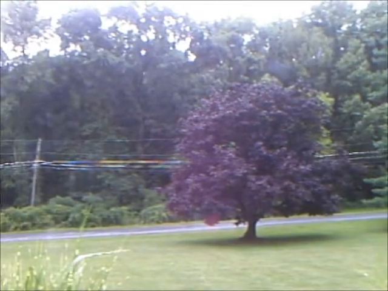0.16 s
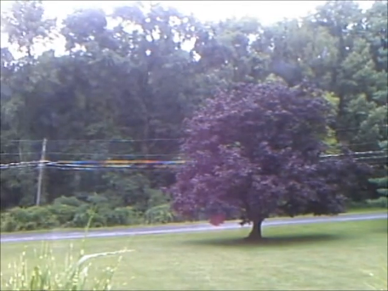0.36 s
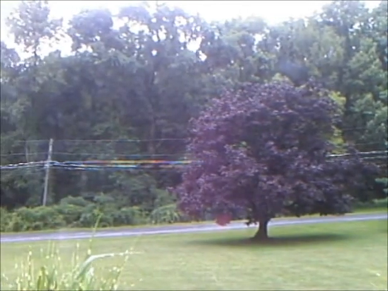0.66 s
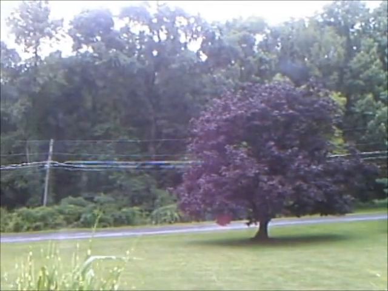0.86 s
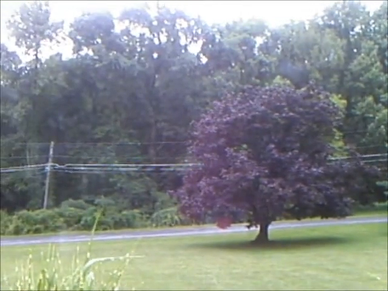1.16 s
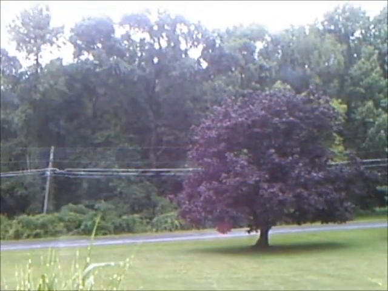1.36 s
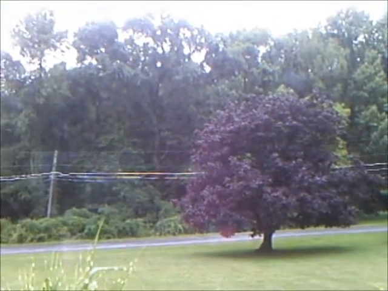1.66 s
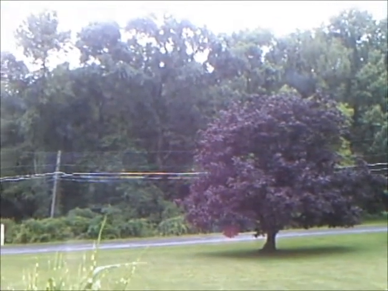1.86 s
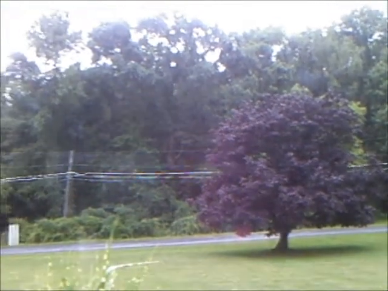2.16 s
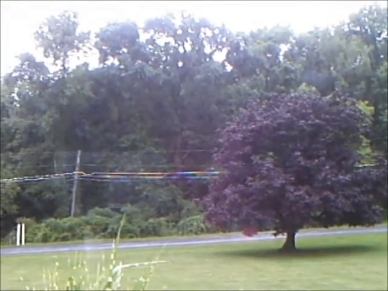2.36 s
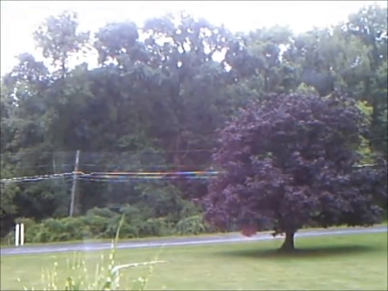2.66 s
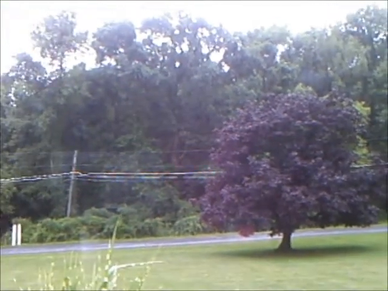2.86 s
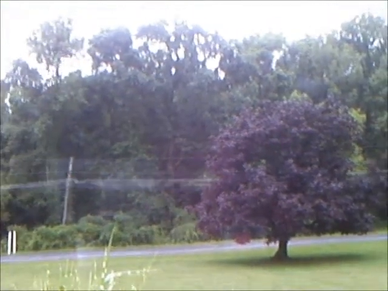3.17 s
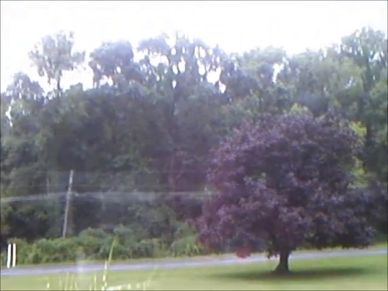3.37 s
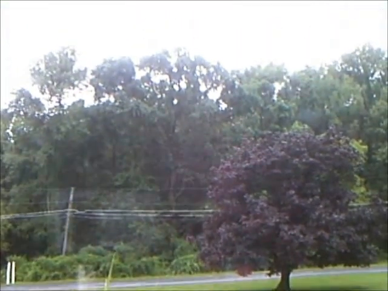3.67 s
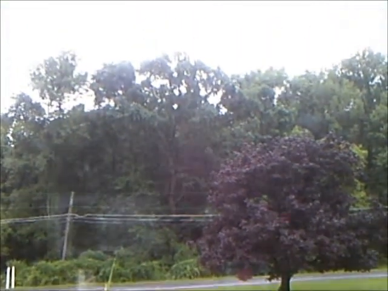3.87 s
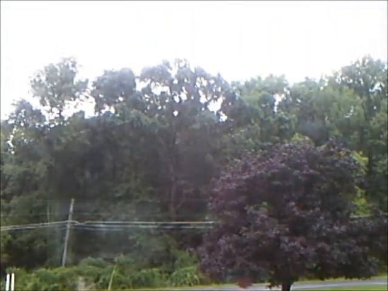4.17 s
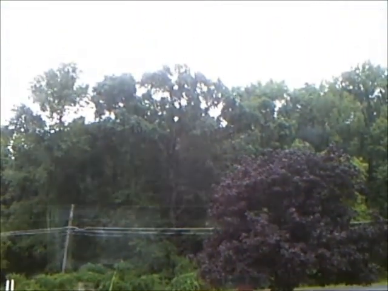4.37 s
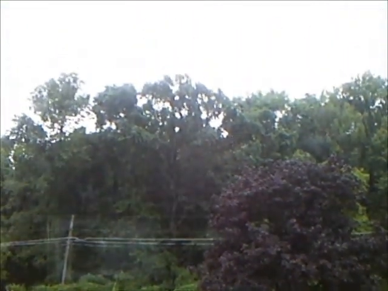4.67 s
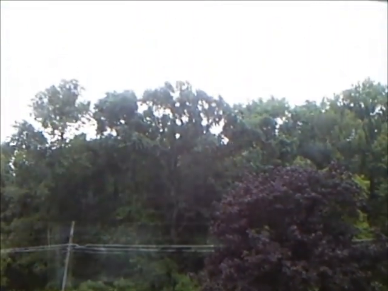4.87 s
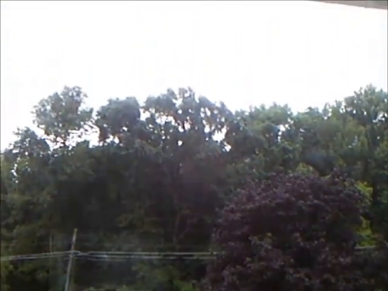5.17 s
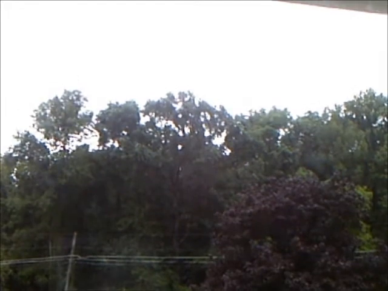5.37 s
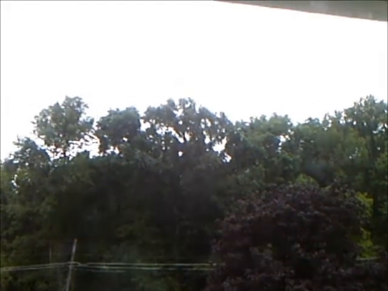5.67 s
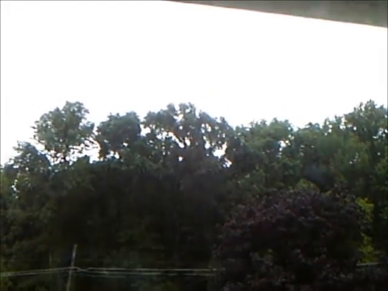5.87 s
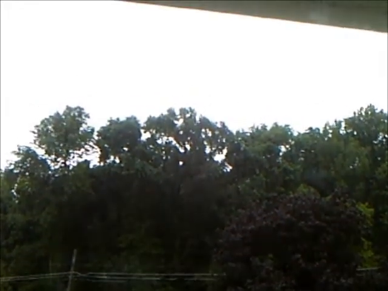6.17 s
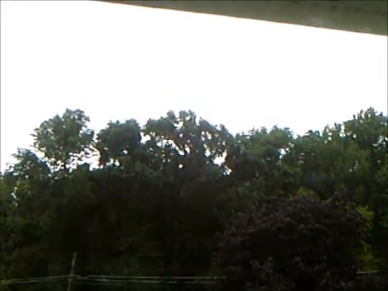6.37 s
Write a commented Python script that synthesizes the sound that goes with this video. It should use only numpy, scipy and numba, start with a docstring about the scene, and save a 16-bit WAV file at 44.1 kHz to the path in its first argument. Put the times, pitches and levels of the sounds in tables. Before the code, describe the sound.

Storm wind roars through tall trees, strongest at first, easing to a lull then gusting again, over deep rumble, low hum and hiss.

```python
"""Tall trees roar in a storm wind, heard from a sheltered porch that shades their tone.
Gusts sweep the crowns as gliding bands of noise; near leaves rustle as a spray of tiny touches.
Air buffets the porch as deep lumpy noise over a steady far rumble.
Faint insects chirp, lisp and pulse as narrow noise; a motor hums in three harmonics,
mains spikes make a thin buzz, and coloured noise hisses throughout."""
import sys
import numpy as np
from scipy import signal
from scipy.fft import rfft, irfft
from scipy.io import wavfile
from numba import njit

SR = 44100
rng = np.random.default_rng(int(sys.argv[2]) if len(sys.argv) > 2 else 0)


def wav_record(signal):
    """Record a signal, one row per channel, as 16-bit PCM in the file named by sys.argv[1]."""
    frames = np.transpose(np.atleast_2d(signal))
    bounded = np.clip(frames, -1, 1)
    # unit amplitude maps onto the largest positive 16-bit level
    quanta = np.round(bounded * 32767).astype(np.int16)
    wavfile.write(sys.argv[1], SR, quanta)


N = 287091
TIME = np.arange(N) / SR
FREQS = np.fft.rfftfreq(N, 1 / SR)


def from_db(db):
    """Decibels to amplitude gain."""
    return 10 ** (np.asarray(db) / 20)


def rms_one(x):
    """Scale to unit power."""
    return x / np.sqrt(np.mean(x ** 2) + 1e-20)


def in_time(rows):
    """Interpolate each column of a time table to one value per sample."""
    times_s, *columns = np.transpose(rows)
    return [np.interp(TIME, times_s, column) for column in columns]


def coloured(x, spectrum):
    """Filter by a gain curve, interpolated in dB over log frequency."""
    hz, db = np.transpose(spectrum)
    gain_db = np.interp(np.log(FREQS + 1), np.log(hz), db)
    return irfft(rfft(x) * from_db(gain_db), N)


def noise(spectrum):
    """Coloured noise, rms 1."""
    return rms_one(coloured(rng.standard_normal(N), spectrum))


def drift(rate_hz):
    """Slow random curve, rms 1: two-pole filtered noise on a grid of 100 samples."""
    grid, settle = 100, 1000
    pole = np.exp(-2 * np.pi * rate_hz * grid / SR)
    draws = rng.standard_normal(N // grid + settle + 2)
    slow = signal.lfilter([1], [1, -2 * pole, pole * pole], draws)[settle:]
    return np.interp(np.arange(N) / grid, np.arange(len(slow)), rms_one(slow))


def swell(peak_s, db, rise_s, fall_s):
    """Gain with a Gaussian rise to a peak and a Gaussian fall."""
    age_s = TIME - peak_s
    side_s = np.where(age_s < 0, rise_s, fall_s)
    return from_db(db) * np.exp(-np.minimum((age_s / side_s) ** 2, 20))


def resonance(x, hz, width_hz):
    """Fixed two-pole resonance, about unit gain at its centre."""
    pole = np.exp(-np.pi * width_hz / SR)
    feed = np.array([1, 0, -1]) * (1 - pole * pole) / 2
    return signal.lfilter(feed, [1, -2 * pole * np.cos(2 * np.pi * hz / SR), pole * pole], x)


@njit
def gliding(x, hz, width_hz):
    """State-variable resonance with a moving centre, about unit gain there."""
    out, band, low = np.zeros(len(x)), 0., 0.
    for i in range(len(x)):
        step = 2 * np.sin(np.pi * hz[i] / SR)
        damping = width_hz / hz[i]
        low += step * band
        band += step * (x[i] - low - damping * band)
        out[i] = damping * band
    return out


def narrow_noise(hz, width_hz):
    """Noise passed twice through one resonance, rms 1."""
    once = resonance(rng.standard_normal(N), hz, width_hz)
    return rms_one(resonance(once, hz, width_hz))


# Roar spectrum before the split. Each row: frequency in Hz, relative density in dB.
WOODS_SPECTRUM = [(30, -28), (80, 2), (150, 1.5), (250, 2), (330, -4), (420, -11), (520, -10.5),
                  (700, -8.5), (900, -6.5), (1300, -12), (1580, -14.5), (1800, -18), (2550, -25),
                  (3100, -29), (9000, -76)]
# Wind strength, used relative to its mean. Each row: time in seconds, strength in dB.
WIND_STRENGTH = [(0.0, -34), (0.18, -36.5), (0.47, -39), (1.79, -41), (3.24, -46), (5.58, -48), (6.51, -43)]


def woods(low_db, high_db, roar_per_wind, bright_share, patchy_db):
    """Countless far branches blend to a smooth roar; its low and high parts sway separately."""
    wind_db, = in_time(WIND_STRENGTH)
    swing_db = roar_per_wind * (wind_db - wind_db.mean())
    bright_db = bright_share * (swing_db - np.median(swing_db))  # treble swells less
    lowpass = signal.butter(2, 600, fs=SR, output="sos")
    highpass = signal.butter(2, 600, "high", fs=SR, output="sos")
    low = signal.sosfilt(lowpass, noise(WOODS_SPECTRUM))
    high = signal.sosfilt(highpass, noise(WOODS_SPECTRUM))
    low_gain = from_db(low_db + swing_db + patchy_db * drift(2.1))
    high_gain = from_db(high_db + bright_db + patchy_db * drift(0.89))
    return low * low_gain + high * high_gain


# Gusts in the crowns; narrow ones whistle faintly. Each row: peak in seconds, level in dB, rise in seconds,
# fall in seconds, centre at the peak in Hz, glide in octaves per second, nominal width in Hz.
CROWN_GUSTS = [ (.05, -45, 0.35, 0.43, 344, -0.16, 170), (.05, -44, .3, .32, 707, 0.38, 346),
               (.58, -41.5, 0.52, 0.47, 877, 0.27, 340), (1.45, -56, 1.5, .2, 2043, 0.04, 151),
               (1.5, -49.5, .7, 1.6, 857, -0.27, 320), (1.58, -47.5, .4, 1.5, 2070, -0.39, 1180),
               (1.8, -52.5, 1.8, 1.6, 310, -0.0086, 153), (2.8, -48, 1.85, 1.25, 1216, -0.0045, 520),
               (3.699, -61, 1.3, 1.08, 2472, 0.038, 240), (4.8, -51.5, .42, 1.03, 1210, -0.0045, 570),
               (5.55, -64, .3, .3, 2520, 0.062, 200), (6.14, -44, 0.26, 0.52, 1200, -0.17, 500),
               (6.28, -45, 0.19, 0.38, 922, 0.017, 270), ]


def gust(row, flutter_db, churn_db, waver):
    """Twigs shed eddies at a pitch following air speed, so the rush glides as the gust passes."""
    peak_s, db, rise_s, fall_s, centre_hz, glide_oct_per_s, width_hz = row
    age_s = np.clip(TIME - peak_s, -2 * rise_s, 2 * fall_s)
    hz = centre_hz * 2 ** (glide_oct_per_s * age_s) * np.exp(waver * drift(4.9))
    rush = rng.standard_normal(N)
    for _ in range(4):  # steep flanks; each pass is wider than the nominal band
        rush = gliding(rush, hz, 1.32 * width_hz)
    unsteady = from_db(flutter_db * drift(10.0) + churn_db * drift(76))
    return rms_one(rush) * swell(peak_s, db, rise_s, fall_s) * unsteady


# Filter for the touches. Each row: frequency in Hz, relative gain in dB.
LEAF_SPECTRUM = [(400, -30), (1500, 5), (2000, 7.5), (3000, 3), (3700, 1.5), (4300, 4.5), (5200, 0),
                 (6300, 1.5), (7000, -8), (7700, -2.5), (9000, -13), (15000, -34)]
# Branches shaken harder. Each row: peak in seconds, rustle in dB, rise in seconds, fall in seconds.
LEAF_SHAKES = [(.15, -56, 0.89, 0.54), (1.23, -56, 0.39, 0.3), (6.0, -73, 0.44, .4)]


def leaves(rustle_db, touches_per_s, spread_db):
    """Near leaves brush in a dense spray of random touches, louder when their branches shake."""
    hits = rng.random(N) < touches_per_s / SR
    strength = rng.standard_normal(N) * from_db(spread_db * rng.standard_normal(N))
    rustle = rms_one(coloured(hits * strength, LEAF_SPECTRUM))
    shaking = from_db(rustle_db) + sum(swell(*shake) for shake in LEAF_SHAKES)
    return rustle * shaking * from_db(0.32 * drift(4.6))


# Porch reflections. Each row: centre in Hz, width in Hz, lift in dB (negative weakens).
PORCH_BANDS = [(878, 152, 4), (1222, 190, 4), (1574, 180, 3.5), (2660, 82, 0), (3550, 400, -0.5)]


def porch(x):
    """Reflections under the roof favour or weaken broad bands."""
    changes = [(from_db(lift_db) - 1) * resonance(x, hz, width_hz)
               for hz, width_hz, lift_db in PORCH_BANDS]
    return x + sum(changes)


# Buffeting spectrum. Each row: frequency in Hz, relative density in dB.
BUFFET_SPECTRUM = [(4, -19), (8, -3), (22, -4), (33, 0), (46, 5), (60, -7), (75, -8.5), (110, -35),
                   (180, -36), (400, -57), (2000, -100)]
# Puffs of air. Each row: peak in seconds, level in dB, rise in seconds, fall in seconds.
AIR_PUFFS = [(.15, -29.5, .16, 0.14), (.42, -27.5, 0.12, 0.16), (1.17, -37, 0.025, 0.036),
             (1.42, -34, 0.14, 0.15), (1.97, -42, .14, .24), (3.299, -36, 0.079, 0.091),
             (5.42, -37, .15, .07), (6.34, -37, .05, 0.066)]


def buffeting(base_db, lumpy_db, lumps_hz):
    """Air pushes on the porch in deep random lumps, now and then in a stronger puff."""
    push = from_db(base_db) + sum(swell(*puff) for puff in AIR_PUFFS)
    return noise(BUFFET_SPECTRUM) * push * from_db(lumpy_db * drift(lumps_hz))


# Far storm spectrum. Each row: frequency in Hz, relative density in dB.
RUMBLE_SPECTRUM = [(15, -6), (45, -11.5), (62, 2.5), (78, -1), (95, 0.5), (120, 0.5), (150, -0.5),
                   (240, -6.5), (330, -17.5), (500, -16.5), (2000, -72)]


def far_rumble(level_db):
    """The far storm never lets up: steady deep noise."""
    return from_db(level_db) * noise(RUMBLE_SPECTRUM)


# Short high insect lisps. Each row: peak in seconds, level in dB.
INSECT_LISPS = [(.51, -66), (.85, -62), (1.11, -60), (1.22, -64), (6.09, -60)]


def insects(trill_peak_db, trill_hz):
    """One insect chirps about three times a second, a higher one pulses, and a few lisps come between."""
    first_s, every_s, chirp_side_s, lisp_side_s = .012, .343, .075, .023
    chirp_db, chirp_spread_db = -65.5, .6
    song = narrow_noise(hz=5830, width_hz=290)
    song = rms_one(song / np.abs(signal.hilbert(song)))  # raspy pitch, even strength
    beats_s = np.arange(first_s, TIME[-1], every_s)
    chirp_gain = sum(swell(s, chirp_db, chirp_side_s, chirp_side_s) for s in beats_s)
    chirps = song * chirp_gain * from_db(chirp_spread_db * drift(1))
    lisp_gain = sum(swell(s, db, lisp_side_s, lisp_side_s) for s, db in INSECT_LISPS)
    lisps = narrow_noise(hz=7460, width_hz=920) * lisp_gain
    pulses = np.sin(np.pi * (trill_hz * TIME + .1 * drift(1))) ** 2
    trill = from_db(trill_peak_db) * pulses * narrow_noise(hz=8220, width_hz=310)
    return chirps + lisps + trill


# Motor hum. Each row: time in seconds, then first, second and third harmonic rms in dB before wavering.
MOTOR_HUM = [(0, -39.5, -48.5, -42.5), (1.2, -41.5, -42, -44), (2.6, -39, -48.5, -49.5),
             (4, -39.5, -48, -55), (6.51, -39.5, -46, -59)]


def motor(motor_hz, waver_db, wander_rad):
    """A motor turning just under mains speed: harmonics of one wandering phase, wavering in level."""
    phase = 2 * np.pi * motor_hz * TIME + wander_rad * drift(1.57)
    hum = np.zeros(N)
    for k, db in enumerate(in_time(MOTOR_HUM), 1):
        hum += np.sqrt(2) * from_db(db + waver_db * drift(2.0)) * np.sin(k * phase)
    return hum


# Switching spikes per half cycle. Each row: delay in seconds, peak before filtering in dB.
MAINS_SPIKES = [(.0013, -50), (.00172, -50.5), (.00305, -43.2)]
# Buzz filter. Each row: frequency in Hz, gain in dB.
BUZZ_SPECTRUM = [(1000, -12), (3500, 4), (5400, 6), (7000, 2), (9000, 1.5), (12000, 0), (16000, -4)]


def mains_buzz(mains_hz):
    """Sharp band-limited spikes on every half cycle of the mains, up and down in turn."""
    spikes = np.zeros(N)
    for delay_s, db in MAINS_SPIKES:
        half_cycles = 2 * mains_hz * (TIME - delay_s)
        nearest = np.round(half_cycles)
        offset_samples = (half_cycles - nearest) * SR / (2 * mains_hz)
        spikes += from_db(db) * np.cos(np.pi * nearest) * np.sinc(offset_samples)
    return coloured(spikes, BUZZ_SPECTRUM)


# Hiss spectrum. Each row: frequency in Hz, relative density in dB.
HISS_SPECTRUM = [(500, -2), (2500, 11.5), (3600, 4.5), (4400, 2), (5300, 4.5), (6000, 6.5), (6500, 6),
                 (7100, 2), (7900, -3), (8800, -6), (11000, -6), (16000, -7.5)]


def steady_hiss(level_db):
    """Constant coloured noise."""
    return from_db(level_db) * noise(HISS_SPECTRUM)


def scene():
    """Trees shaded by the porch, then air, far storm, insects, hum, buzz and hiss."""
    trees = woods(low_db=-41.5, high_db=-42, roar_per_wind=1.2, bright_share=0.13, patchy_db=-0.3)
    trees += sum(gust(row, flutter_db=1.1, churn_db=0.76, waver=0.022) for row in CROWN_GUSTS)
    trees += leaves(rustle_db=-61, touches_per_s=14000, spread_db=2.0)
    air = buffeting(base_db=-40.0, lumpy_db=1.3, lumps_hz=14) + far_rumble(level_db=-43.0)
    calls = insects(trill_peak_db=-73, trill_hz=5.2)
    electric = motor(motor_hz=59.87, waver_db=2.5, wander_rad=.4) + mains_buzz(mains_hz=59.965)
    return (porch(trees) + air + calls + electric + steady_hiss(level_db=-56.0))[None]


def record(dry):
    """Cut the top steeply above 15.6 kHz."""
    ripple_db, stop_db, cutoff_hz = .1, 80, 15600
    lowpass = signal.ellip(12, ripple_db, stop_db, cutoff_hz, fs=SR, output="sos")
    return signal.sosfilt(lowpass, dry)


dry = scene()
out = record(dry)
wav_record(out)
```